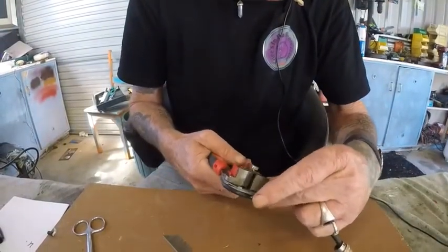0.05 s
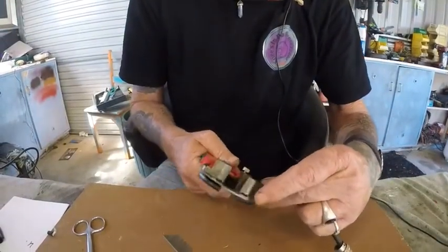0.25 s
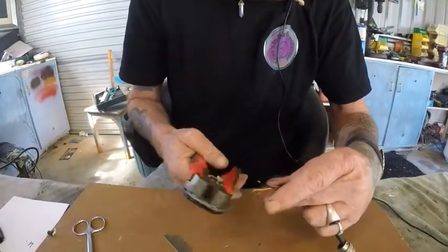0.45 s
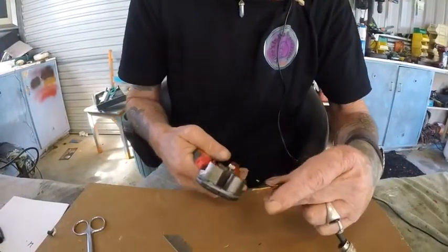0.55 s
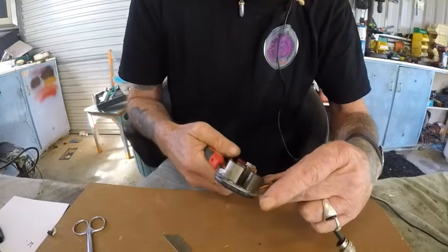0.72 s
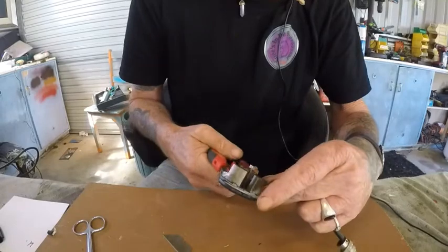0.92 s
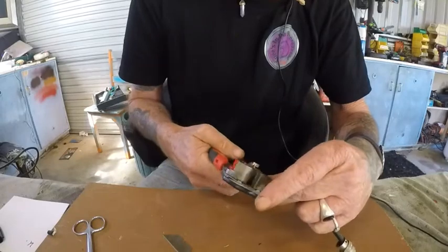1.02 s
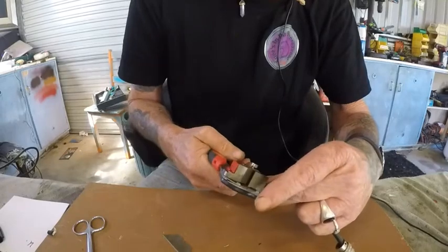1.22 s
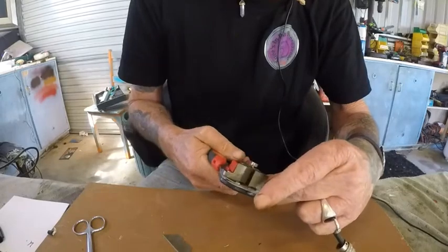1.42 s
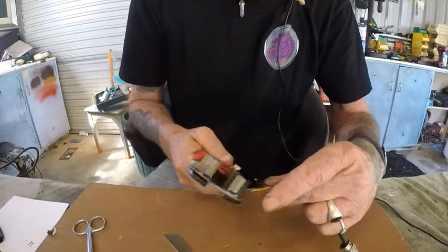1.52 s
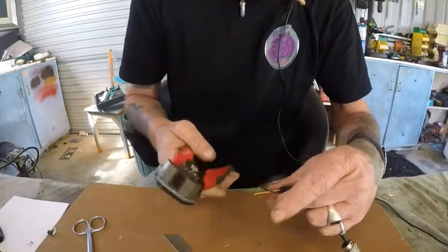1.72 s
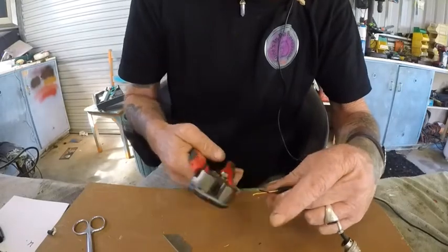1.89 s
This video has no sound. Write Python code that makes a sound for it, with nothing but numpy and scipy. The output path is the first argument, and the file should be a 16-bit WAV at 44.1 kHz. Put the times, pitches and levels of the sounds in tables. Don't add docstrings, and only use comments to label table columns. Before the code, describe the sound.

Close, bright metal clicks from a wire stripper, left of centre: one paired snap early, quiet handling ticks midway, then a second paired snap. Soft room hiss, low air rumble and distant bird chirps behind, in a reverberant shed.

```python
import sys
import numpy as np
from scipy import signal
from scipy.fft import rfft, irfft
from scipy.io import wavfile
from scipy.ndimage import uniform_filter1d

SR = 44100
rng = np.random.default_rng(int(sys.argv[2]) if len(sys.argv) > 2 else 0)


def elevation(decibels):
    levels = np.asarray(decibels, float)
    return 10 ** (levels / 20)


def log_audio(samples):
    frames = np.atleast_2d(samples).T
    limited = np.clip(frames, -1, 1)
    pcm = np.round(limited * 32767).astype(np.int16)
    wavfile.write(sys.argv[1], SR, pcm)


N = 85995
THUD_HZ = 650


def level(x, db):
    return x * elevation(db) / np.sqrt(np.mean(x ** 2))


def band(x, hz, width):
    return signal.lfilter(*signal.iirpeak(hz, max(hz / width, .5), fs=SR), x)


def on_log(table, hz):
    table = np.array(table)
    return np.interp(np.log(hz + 1e-3), np.log(table[:, 0]), table[:, 1])


def pair(table, alike):
    hz = np.arange(N // 2 + 1) * SR / N
    mid, side = rfft(rng.standard_normal((2, N))) * elevation(on_log(table, hz))
    likeness = np.clip(alike(hz), -1, 1)
    mid = mid * np.sqrt(1 + likeness)
    side = side * np.sqrt(1 - likeness)
    return irfft(np.array([mid + side, mid - side]), N)


def walk(rate_hz):
    hold = int(SR / rate_hz)
    steps = np.repeat(rng.standard_normal(N // hold + 1), hold)
    smooth = uniform_filter1d(uniform_filter1d(steps, hold), hold)[:N]
    return smooth / smooth.std()


def add(out, start_s, x):
    i = int(round(start_s * SR))
    x = x[..., :out.shape[-1] - i]
    out[..., i:i + x.shape[-1]] += x


def tone(length_s, from_hz, to_hz, rough):
    u = np.linspace(0, 1, int(length_s * SR))
    flutter = 1 + rough * np.interp(u, np.linspace(0, 1, num=12), rng.standard_normal(12))
    phase = 2 * np.pi * np.cumsum(from_hz + (to_hz - from_hz) * u) / SR
    return np.sin(phase) * np.sin(np.pi * u) ** .5 * flutter


# pitch_hz, density_db (per Hz)
HISS_SPECTRUM = [(88, -33), (150, 2), (308, -3), (607, -3.5), (681, -3.5), (2310, -13.5), (3760, -16.5),
                 (6230, -20.5), (15500, -82.5)]
# pitch_hz, likeness_0_to_1
HISS_LIKENESS = [(150, 0.093), (800, 0.47), (3100, 0.35), (15000, .03)]
# pitch_hz, density_db (per Hz)
AIR_SPECTRUM = [(3, 2.5), (8, -2), (45, -18.5), (120, -29), (400, -59.5)]
# time_s, level_db
GUST_LEVELS = [(0, -7), (.15, 2), (.4, 0.5), (.7, -3), (1.003, -6), (1.2, -4), (1.26, -1), (1.33, -6),
               (1.44, 4.5), (1.62, 2.5), (1.75, -3), (1.9, 0), (1.95, -2)]


def room_tone():
    hiss_db, air_db, opposed, pan_db = -64.5, -39.5, .71, -3.5
    hiss = level(pair(HISS_SPECTRUM, lambda hz: on_log(HISS_LIKENESS, hz)), hiss_db)
    hiss = hiss * elevation(.7 * walk(3))
    gust_db = np.interp(np.arange(N) / SR, *np.array(GUST_LEVELS).T) + 2.0 * walk(6.31)
    air = pair(AIR_SPECTRUM, lambda hz: -opposed * np.clip(70 / (hz + 1), 0, 1))
    air = level(air, air_db) * elevation(gust_db)
    return hiss + air * elevation([[pan_db / 2], [-pan_db / 2]])


def earlier_tail():
    level_db, pitch_hz, t60_s = -63.5, 1100, .8
    noise = band(rng.standard_normal((2, N)), pitch_hz, pitch_hz)
    return level(noise, level_db) * elevation(-60 * np.arange(N) / SR / t60_s)


# start_s, level_db
BIRD_PHRASES = [(-.2, -43), (-.04, -54), (0.122, -49.5), (0.278, -51.5), (0.444, -49), (0.609, -52.5),
                (0.766, -80)]
# offset_s, length_s, from_hz, to_hz, level_db
BIRD_NOTES = [
    (0, 0.023, 2956, 2972, 7.5),
    (0.038, 0.046, 2900, 1906, 1.5),
    (0.102, 0.016, 2870, 2900, -0.5),
    (0.13, 0.055, 2830, 2230, -12),
]


def bird():
    rough, t60_s, direct_db, left_db = .65, .81, -11, -6
    lead = SR // 4
    song = np.zeros(N + lead)
    for start_s, phrase_db in BIRD_PHRASES:
        for offset_s, length_s, from_hz, to_hz, note_db in BIRD_NOTES:
            note = tone(length_s, from_hz, to_hz, rough) * elevation(phrase_db + note_db)
            add(song, start_s + offset_s + lead / SR, note)
    t = np.arange(SR) / SR
    tail = rng.standard_normal((2, SR)) * elevation(-60 * t / t60_s)
    tail /= np.sqrt(np.sum(tail ** 2, axis=1, keepdims=True))
    echo = signal.fftconvolve(song[None], tail, axes=1)[:, lead:lead + N]
    return echo + song[lead:] * elevation([[direct_db + left_db], [direct_db]])


# start_s, frame_db, jaw_db, blade_db, t60_s (of the scrape)
FIRST_SQUEEZE_CONTACTS = [(0.13, -34, -33, -35, 0.025), (0.1424, -45, -53, -38, 0.0085),
                          (0.1412, -50, -54, -13.5, 0.015), (0.142, -46, -29, -56, 0.046),
                          (0.1474, -24.5, -27, -20, 0.0077), (0.1505, -69, -19.5, -45.5, 0.0039),
                          (0.24, -37, -58, -42, 0.0035), (0.247, -36, -37, -23.5, 0.0078),
                          (0.26, -32, -55, -26, 0.0034), (0.32, -32, -31, -36.0, 0.0095),
                          (0.3211, -34, -40, -24, 0.0087), (0.327, -34, -23, -19.5, 0.0026),
                          (0.3409, -19, -14.5, -11, 0.0021), (0.344, -40, -28, -12, 0.014),
                          (0.3476, -42, -44, -45, 0.0046), (0.3678, -56, -26, -12.5, 0.02),
                          (0.3701, -59, -23, -9.5, 0.013), (0.3761, -35, -17.5, -35, 0.0067)]
REGRIP_CONTACTS = [(0.967, -50, -30, -60, 0.0018), (0.9739, -37.5, -30.5, -70, 0.0017),
                   (0.9762, -68, -38.5, -57.5, 0.0016), (0.9801, -54, -37.5, -66, 0.0026),
                   (0.999, -58, -43, -44, 0.0044), (1.0134, -49, -31.5, -41, 0.0096),
                   (1.044, -35, -35.5, -67, 0.013), (1.049, -52, -33, -41, 0.0052),
                   (1.0513, -62, -68, -38.5, 0.0073), (1.2855, -63, -42.5, -52, 0.0044),
                   (1.3688, -31.5, -28.5, -69, 0.0044), (1.3734, -32, -48, -23, 0.0085),
                   (1.3785, -35, -33, -42, 0.011)]
SECOND_BITE_CONTACTS = [(1.4112, -32, -41, -25.5, 0.0049), (1.4168, -35, -17.5, -14.5, 0.0041),
                        (1.4164, -45, -53, -21, 0.0067), (1.4193, -55, -48, -11, 0.011),
                        (1.4225, -34, -23, -45, 0.035), (1.4275, -41, -48, -46, 0.0087),
                        (1.444, -51, -59, -49, 0.0088), (1.449, -45, -38, -38, 0.0077),
                        (1.486, -54, -55, -41, 0.0024), (1.5291, -27.5, -33, -19.5, 0.0089),
                        (1.5355, -40, -44, -18.5, 0.0017), (1.5394, -48, -36, -20.5, 0.0025),
                        (1.547, -38, -30, -28, 0.0055)]
SECOND_RELEASE_CONTACTS = [(1.5593, -39, -51, -24, 0.023), (1.567, -57, -30, -46, 0.038),
                           (1.5759, -38, -62, -15, 0.0069), (1.5829, -40, -25, -13, 0.011),
                           (1.586, -24, -65, -48, 0.013), (1.6227, -24, -65, -13, 0.039),
                           (1.6259, -23.5, -21, -12.5, 0.0038), (1.6294, -36, -18, -51, 0.0068),
                           (1.6337, -27.5, -56, -22, 0.0086)]
# echo_db, treble_db
HAND_TURNS = [
    (-1.5, -1),
    (-2, -5),
    (-5, -10),
    (-2, -1),
]
# pitch_hz, width_hz, level_db
FRAME_MODES = [(1980, 520, 0), (2300, 600, -4)]
JAW_MODES = [(2900, 1290, -7), (3250, 260, -15)]
BLADE_MODES = [(4180, 620, 5), (5044, 1680, 13.5), (6000, 860, 5.5), (7650, 2100, 9.5), (11380, 496, -39),
               (12400, 940, -7.5)]


def contacts():
    rise_share, wide, treble_hz = .25, 4, 12500
    scatter_db, detune = 2.5, .03
    right_db, right_low_db, right_own = -14.5, -5, .7
    out, lead = np.zeros((3, N)), 200
    t = (np.arange(1100) - lead) / SR
    groups = (FIRST_SQUEEZE_CONTACTS, REGRIP_CONTACTS, SECOND_BITE_CONTACTS, SECOND_RELEASE_CONTACTS)
    for group, (echo_db, treble_db) in zip(groups, HAND_TURNS):
        for start_s, *part_db, t60_s in group:
            at_s = start_s - lead / SR
            scrape = rng.standard_normal((3, len(t)))
            chance = rng.standard_normal((2, 10))
            scrape[1] = np.sqrt(1 - right_own) * scrape[0] + np.sqrt(right_own) * scrape[1]
            scrape *= elevation(-60 * np.maximum(t, -t / rise_share) / t60_s)
            scrape[2] = (t == 0) * np.sqrt(np.sum(scrape[2] ** 2)) * elevation(echo_db)
            k = 0
            for db, modes in zip(part_db, (FRAME_MODES, JAW_MODES, BLADE_MODES)):
                ring = 0
                for hz, width_hz, mode_db in modes:
                    here_hz = hz * (1 + detune * chance[1, k])
                    near = band(band(scrape[:2], here_hz, width_hz), here_hz, wide * width_hz)
                    near = near * elevation(scatter_db * chance[0, k])
                    to_walls = band(scrape[2:], hz, wide * width_hz) / np.sqrt(wide)
                    ring = ring + elevation(mode_db) * np.vstack([near, to_walls])
                    k += 1
                ring = ring + (elevation(treble_db) - 1) * band(ring, treble_hz, treble_hz)
                ring = ring * elevation(db) / np.abs(ring[0]).max()
                add(out, at_s, ring * elevation([[0], [right_db], [0]]))
            thud = band(band(scrape, THUD_HZ, 1700), THUD_HZ, 1700)
            thud = thud * elevation(part_db[0] - 20.5) / np.abs(thud[0]).max()
            add(out, at_s, thud * elevation([[0], [right_low_db], [0]]))
    return out


# pitch_hz, level_db, t60_s
SHED_BANDS = [(326, -43, 0.31), (646, -50, 0.31), (1400, -47.5, 0.29), (2620, -48, 0.59), (5530, -50, 0.45),
              (11100, -54.5, 0.37)]


def shed(x):
    build_s, alike = .007, .44
    t = np.arange(SR // 2) / SR
    tail = 0
    for hz, db, t60_s in SHED_BANDS:
        left, other = rng.standard_normal((2, len(t)))
        ports = np.array([left, alike * left + np.sqrt(1 - alike ** 2) * other])
        tail = tail + band(band(ports, hz, hz), hz, hz) * elevation(db - 60 * t / t60_s)
    tail = tail * np.clip(t / build_s - 1, 0, 1)
    return signal.fftconvolve(x[None], tail, axes=1)[:, :N]


# start_s,
# pitch_hz, peak_db, t60_s
PART_PINGS = [(.1422, 8900, -19, 0.009), (0.147, 8770, -12.5, 0.0063), (0.1496, 561, -18.5, 0.018),
              (0.1517, 880, -28.5, 0.031), (1.4234, 8620, -8.5, 0.0046), (1.5165, 14300, -27.5, 0.0026),
              (.3699, 2700, -4, .008), (1.6279, 1980, -8.5, .009), (1.6277, 1600, -19, .007),
              (1.6212, 7300, -26, 0.0068), (1.6252, 1040, -30, 0.014),
              (0.1434, 340, -32, 0.023), (0.1519, 302, -34.5, 0.038), (0.1485, 1216, -30.5, 0.042),
                (0.3461, 1100, -32, 0.014), (.3692, 854, -28, 0.016), (0.3719, 292, -37.5, 0.02),
                (1.4180, 279, -31.5, 0.022), (1.4183, 600, -28, 0.017), (1.4213, 885, -31.5, 0.014),
                (1.4442, 830, -40.5, 0.016), (1.4435, 262, -45, 0.025), (1.5348, 484, -38, 0.019),
                (1.534, 272, -43, 0.019), (1.5834, 977, -36.5, .025), (1.6280, 246, -38, 0.024),
              (.1403, 1830, -15, .022), (.1435, 2150, -21, .012), (.3442, 2300, -14, .01),
                (.3689, 2950, -14, .016), (1.4163, 1850, -13, .015), (1.4203, 2050, -20, .018),
                (1.5752, 2100, -20, .012), (1.5826, 2050, -25, .02), (1.5584, 2150, -27, .014),
                (1.5343, 2250, -30, .016), (1.6254, 2600, -17, .008), (.1478, 1750, -30, .015),
                (.3700, 5000, -18, .006), (1.3684, 5200, -32, .005), (1.4178, 8500, -16, .006),
                (1.5290, 14000, -36, .004), (1.5825, 14200, -28, .004), (.3722, 2400, -20, .008),
                (.141, 850, -38, .02), (1.4165, 1150, -36, .01)]
# pitch_hz, level_db
RIGHT_SHADOW = [(260, 5), (550, -8), (900, 0.5), (1600, -19)]


def pings():
    right_lag_rad = 1.36
    out, t = np.zeros((2, N)), np.arange(2000) / SR
    for start_s, hz, db, t60_s in PART_PINGS:
        ring = np.sin(2 * np.pi * hz * t - np.array([[0], [right_lag_rad]]))
        ring = ring * np.minimum(t * hz, 1) * elevation(db - 60 * t / t60_s)
        add(out, start_s, ring * elevation([[0], [on_log(RIGHT_SHADOW, hz)]]))
    return out


def far_knock():
    start_s, t60_s, level_db, pitch_hz = .688, 1.0, -61.5, 799
    t = np.arange(N) / SR - start_s
    noise = level(band(rng.standard_normal((2, N)), pitch_hz, 1100), level_db)
    return noise * (t > 0) * elevation(-60 * np.abs(t) / t60_s)


# start_s, length_s, from_hz, to_hz, level_db
SPRING_SQUEAKS = [
    (.982, .016, 4450, 4720, -56),
    (1.017, .022, 3870, 3880, -48),
    (1.055, .16, 3875, 3860, -65),
]


def squeaks():
    out = np.zeros((2, N))
    for start_s, length_s, from_hz, to_hz, db in SPRING_SQUEAKS:
        add(out, start_s, tone(length_s, from_hz, to_hz, rough=.25) * elevation([[db], [db - 8]]))
    return out


def scene():
    clicks = contacts()
    rings = pings() + squeaks()
    to_walls = clicks[2] + elevation(-16) * rings[0] + elevation(8.5) * band(rings[0], THUD_HZ, THUD_HZ)
    tool = clicks[:2] + rings + shed(to_walls)
    return room_tone() + earlier_tail() + bird() + tool + far_knock()


def top_cut(x):
    return signal.sosfilt(signal.butter(12, 16480, fs=SR, output="sos"), x)


def record(dry):
    lowpass = signal.butter(10, 14800, fs=SR, output="sos")
    mix = signal.sosfilt(lowpass, dry)
    return top_cut(mix)


dry = scene()
out = record(dry)
log_audio(out)
```